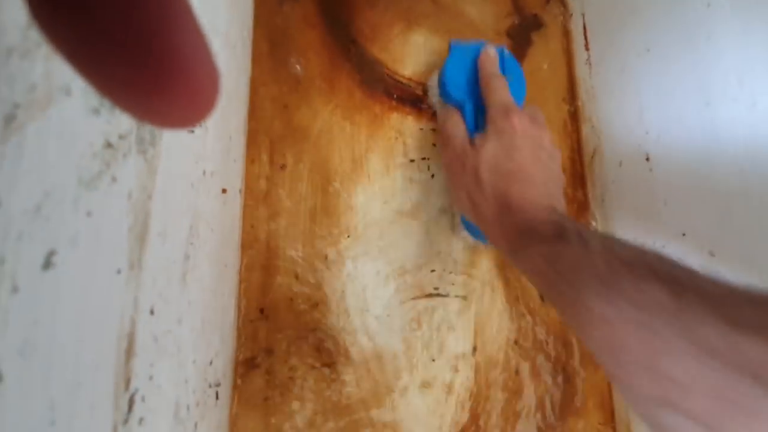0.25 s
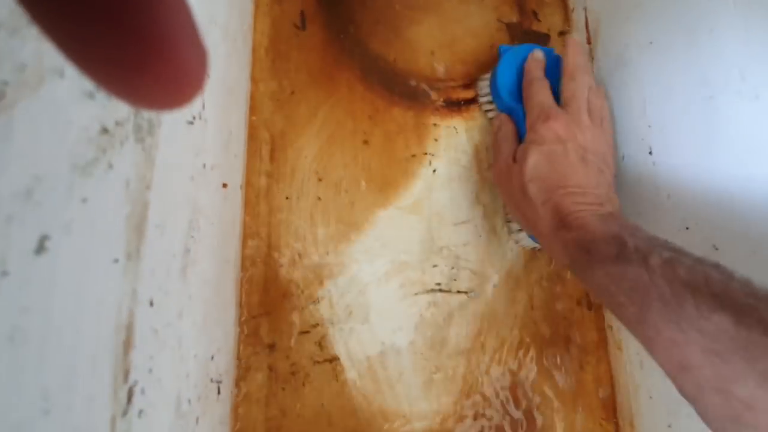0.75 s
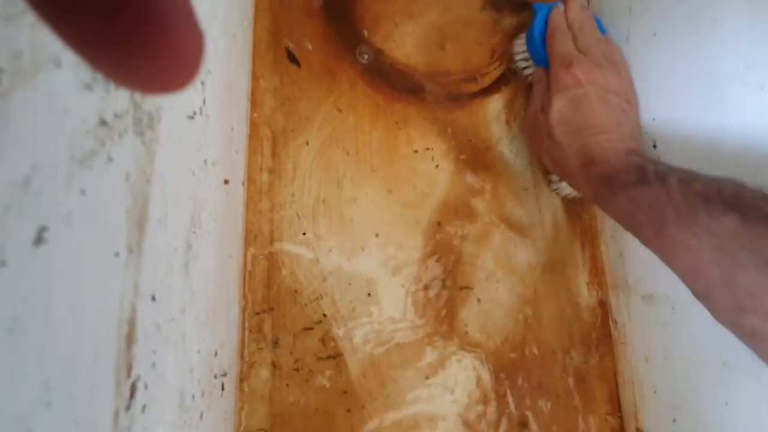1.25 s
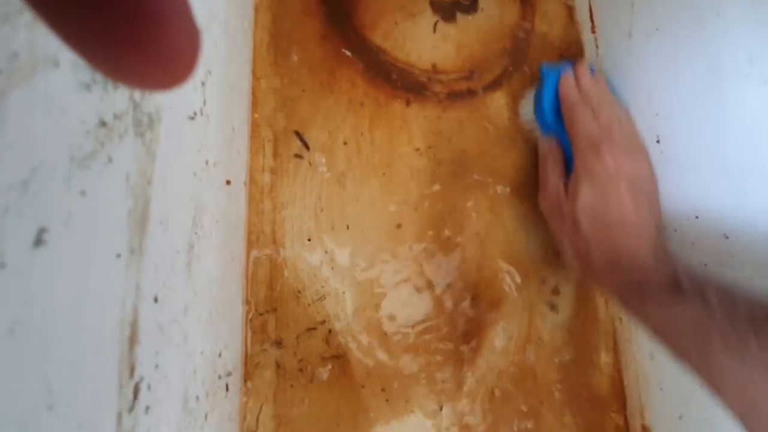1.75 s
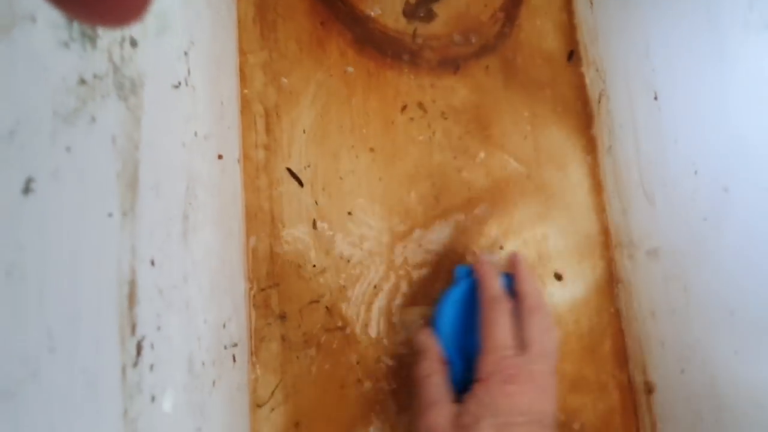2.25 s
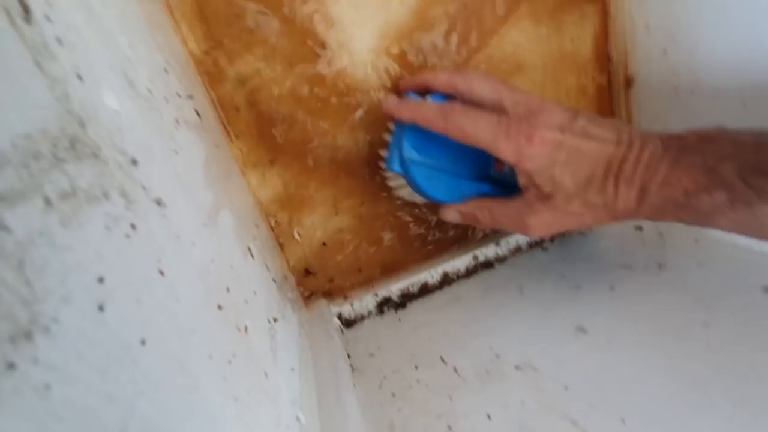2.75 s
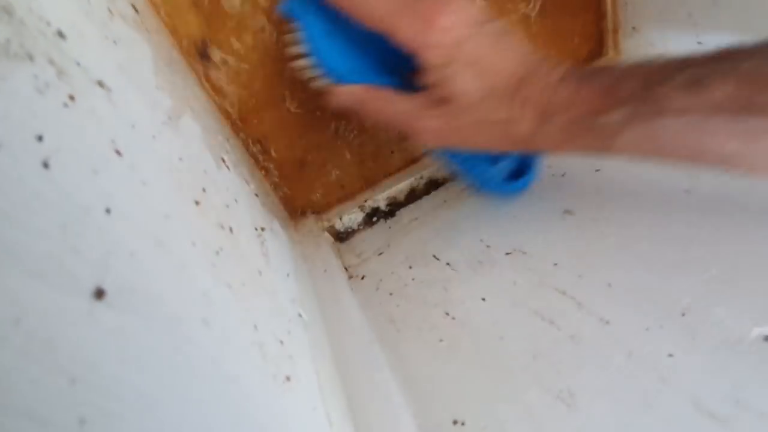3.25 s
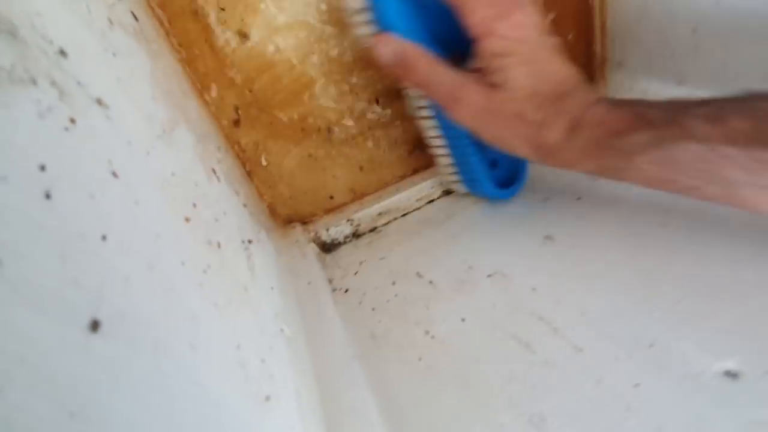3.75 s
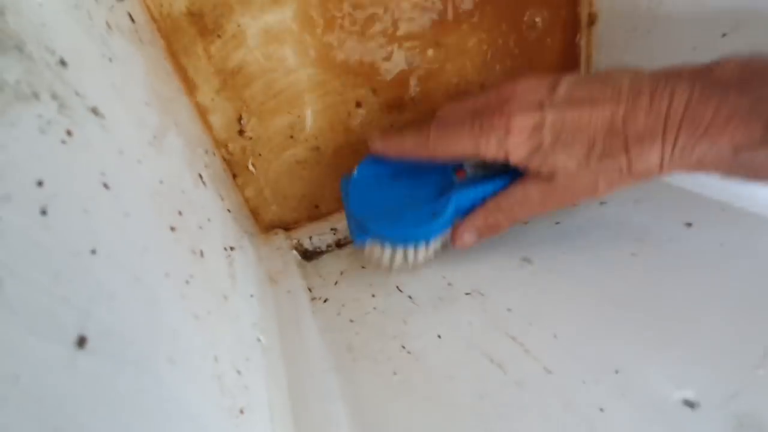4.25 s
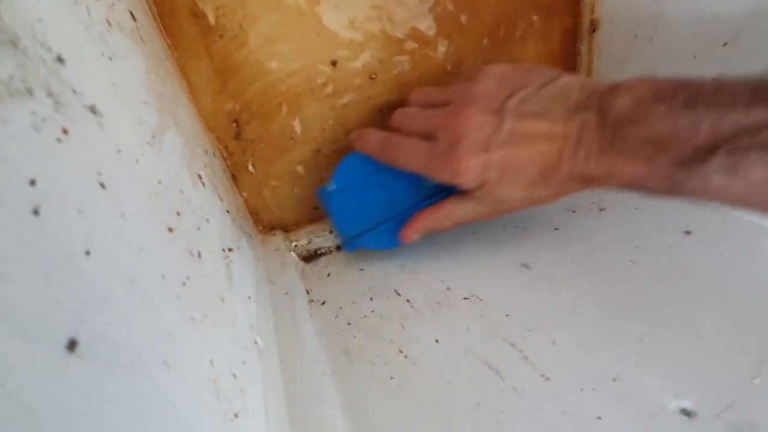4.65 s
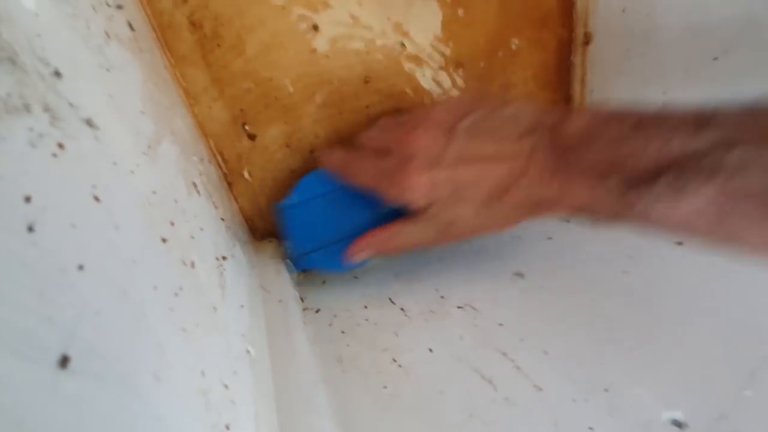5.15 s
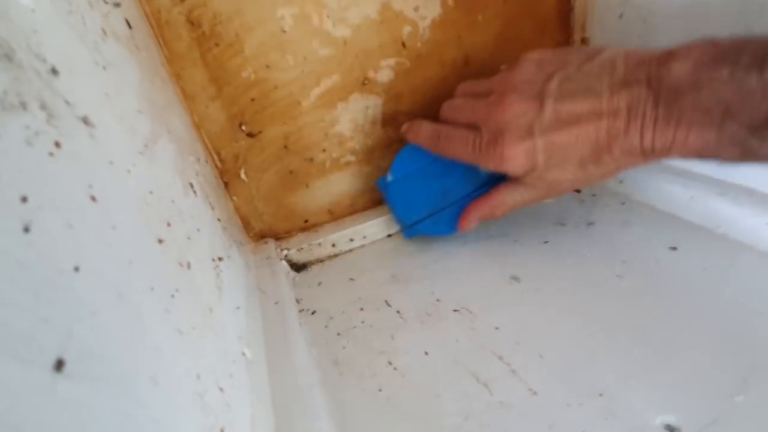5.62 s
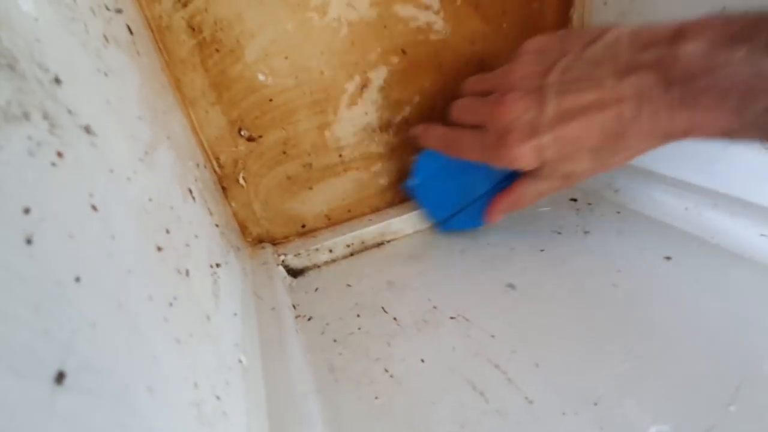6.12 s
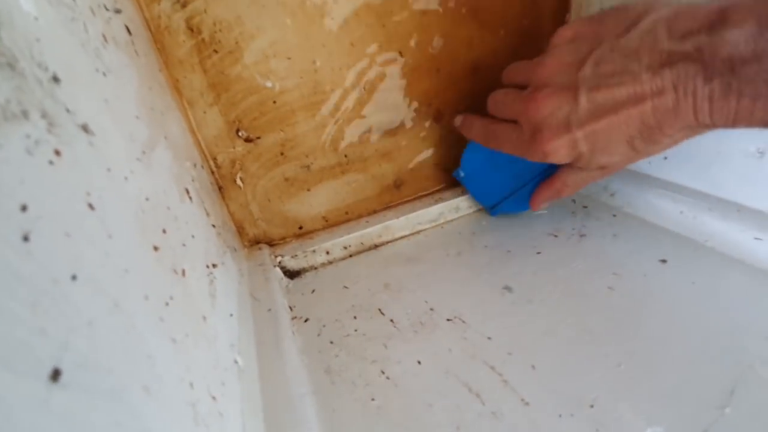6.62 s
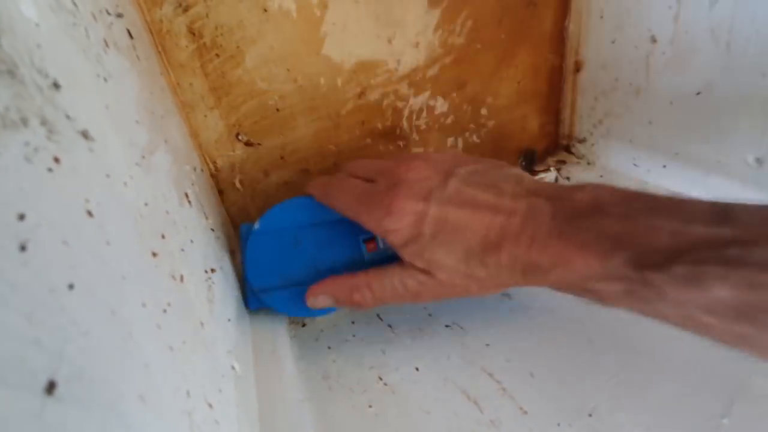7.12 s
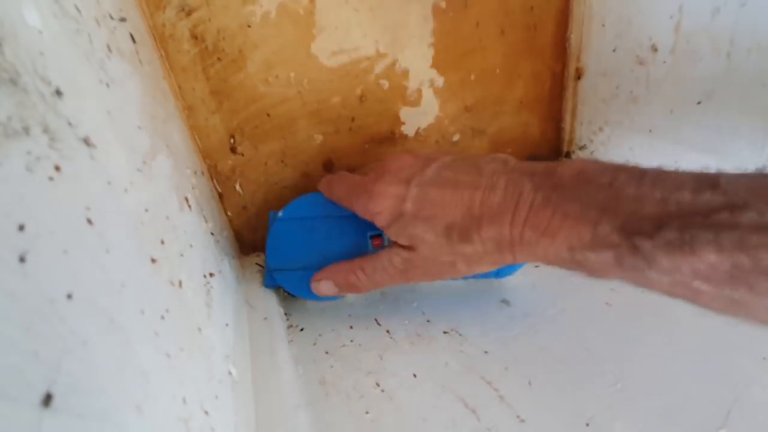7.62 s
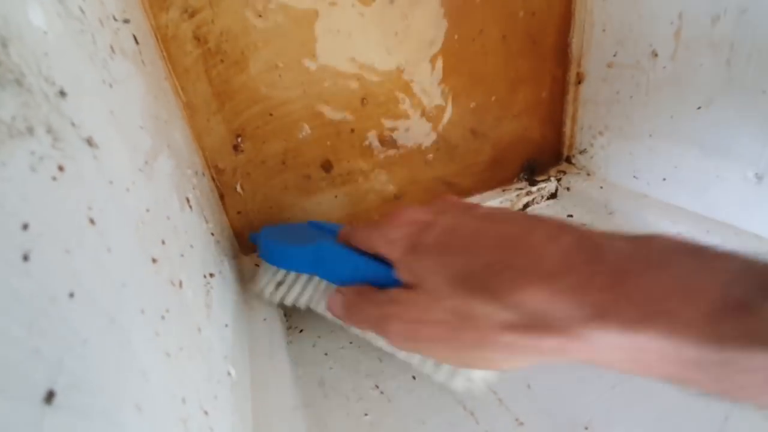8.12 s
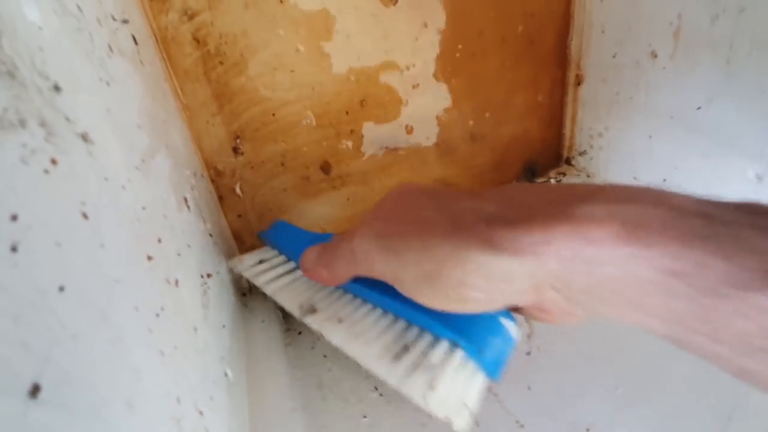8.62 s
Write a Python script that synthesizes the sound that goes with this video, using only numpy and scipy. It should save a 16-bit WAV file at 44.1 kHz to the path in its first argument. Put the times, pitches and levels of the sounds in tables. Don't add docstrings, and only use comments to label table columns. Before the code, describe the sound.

Brisk back-and-forth brushing in a small moulded hollow, heard close up in stereo. Broad wet swishes come first, with a few knocks, then hard juddering rubs as the plastic brush block hits the wall. Strokes become quieter and broken for a moment, then fast and regular along a seam, and finally uneven in a tight corner with snapping bristles and heavy dull thumps. The space answers only briefly over a very faint hush.

```python
import sys
import numpy as np
from scipy import signal
from scipy.fft import rfft, irfft, next_fast_len
from scipy.io import wavfile
from scipy.ndimage import uniform_filter1d, minimum_filter1d, map_coordinates

SR = 44100
rng = np.random.default_rng(int(sys.argv[2]) if len(sys.argv) > 2 else 0)


def invert_db(level):
    return 10 ** (np.asarray(level, dtype=float) / 20)


def wrap_up_sound(samples):
    columns = np.atleast_2d(samples).T
    tamed = np.clip(columns, -1, 1)
    steps = np.round(tamed * 32767).astype(np.int16)
    wavfile.write(sys.argv[1], SR, steps)


N = 391608


def unit(x):
    return x / np.sqrt(np.mean(x ** 2) + 1e-20)


def noise():
    return rng.standard_normal((2, N))


def along(points, hz):
    f, v = np.transpose(points)
    return np.interp(np.log(hz + 1), np.log(f + 1), v)


def wobble(rate_hz):
    step = np.arange(0, N + 64, 32)
    knots = rng.standard_normal(int(N * rate_hz / SR) + 5)
    return np.interp(np.arange(N), step, map_coordinates(knots, [step * rate_hz / SR]))


def filtered(x, response):
    m = next_fast_len(N + SR // 8, real=True)
    return irfft(rfft(x, m) * response(np.fft.rfftfreq(m, 1 / SR)), m)[..., :N]


def coloured(x, points):
    return filtered(x, lambda f: invert_db(along(points, f)))


def modes(table):
    def response(f):
        total = 0
        for k, (hz, width, db) in enumerate(table):
            total = total + (-1) ** k * invert_db(db) * 1j * f * width / (hz * hz - f * f + 1j * f * width)
        return total
    return response


# time in seconds, stiffness from 0 (open floor) to 1 (stiff corner).
CORNER = [
    (0, 0.026),
    (2.7, 0.24),
    (3.05, 1),
    (3.3, 0.63),
    (3.8, 0.76),
    (4.3, 0.8),
    (7.9, 0.84),
    (8.2, 0.97),
    (8.88, 0.69),
]
CORNER_START_S = CORNER[1][0]


def stiffness():
    s, stiff = np.transpose(CORNER)
    return np.clip(np.interp(np.arange(N) / SR, s, stiff), 0, 1)


# start in seconds, length in seconds, tip hiss in dB,
# push on the floor in dB over the hiss, push on the walls in dB over the hiss.
OPEN_FLOOR = [(-0.008, 0.069, -23.5, -4.5, -9), (0.055, 0.2, -20.5, 7.5, 3.5), (0.26, 0.22, -22, -12, -8),
              (0.473, 0.26, -19, 0, -1.5), (0.768, 0.2, -24.5, -15, -9), (0.982, 0.076, -24.5, 3, 5),
              (1.062, 0.13, -26.5, 3, 5), (1.217, 0.22, -27.5, -5, 0.5), (1.472, 0.16, -24, 1, 5.5),
              (1.664, 0.24, -26, -16.5, -15.5), (1.976, 0.14, -40, 9, 14), (2.04, 0.38, -26, -1.5, -3.5),
              (2.427, 0.26, -29, -10, -12)]
SIDE_WALL = [(2.716, 0.15, -28, 0.5, -8), (2.917, 0.099, -28.5, -4.5, 0.5), (3.052, 0.034, -31.5, -20, 1),
             (3.116, 0.49, -31, 6, 12), (3.361, 0.17, -31, 9.5, 11.5), (3.537, 0.16, -35, -1, 5),
             (3.765, 0.066, -38.5, 7, 1), (3.85, 0.062, -51, 5, 8), (3.932, 0.083, -37.5, 8, 8),
             (4.05, 0.031, -44.5, 9, -4), (4.095, 0.054, -53.5, 19, 23.5), (4.17, 0.037, -51, 6, -19),
             (4.218, 0.038, -37.5, -4, 19.5), (4.265, 0.11, -34, -17, 1), (4.387, 0.029, -24.5, -16, 8),
             (4.409, 0.15, -27, -13, -15)]
SEAM = [(4.603, 0.094, -25, -4, -6.5), (4.739, 0.11, -25.5, -11, -14.5), (4.865, 0.095, -22.5, -1.5, -2.5),
        (4.989, 0.072, -24, -6, -6.5), (5.083, 0.044, -21.5, -28, -4), (5.147, 0.049, -36.5, 10, 12.5),
        (5.21, 0.11, -32.5, -20, -3.5), (5.327, 0.061, -26.5, -2, 2), (5.412, 0.17, -23.5, -18, -26),
        (5.581, 0.1, -25.5, -5, -10), (5.716, 0.13, -22, -7, -23), (5.857, 0.11, -26, -8, 2.5),
        (6.011, 0.13, -22, -5, -29), (6.162, 0.1, -29.5, 2, -16), (6.301, 0.064, -28.5, -1, -3.5),
        (6.358, 0.082, -23, -18.5, -10), (6.437, 0.16, -35, 6.5, 5), (6.615, 0.1, -26.5, 3.5, 3.5),
        (6.677, 0.042, -19.5, -12, 0), (6.761, 0.016, -43, 1, 13), (6.801, 0.066, -31, -42, 2.5)]
FAR_CORNER = [(7.022, 0.062, -20.5, -2.5, 5), (7.102, 0.094, -25.5, 0, -6.5), (7.237, 0.057, -46, 19, 0),
              (7.328, 0.04, -44, 4, 5), (7.379, 0.078, -28.5, 13.5, -6), (7.485, 0.08, -28.5, -15, -7),
              (7.578, 0.092, -28, -1, 6), (7.664, 0.13, -35.5, 0, 7), (7.81, 0.072, -41, 6, 1),
              (7.915, 0.073, -30, -6, -1.5), (7.986, 0.052, -27.5, -16, -43), (8.036, 0.14, -30.5, -9, -3),
              (8.146, 0.12, -26.5, -18, -13), (8.272, 0.039, -22.5, -1, -1.5),
              (8.329, 0.085, -22.5, -5, -8.5), (8.432, 0.042, -24.5, 7.5, -12),
              (8.568, 0.075, -29, -29, -11), (8.656, 0.055, -25, 3.5, -2), (8.747, 0.1, -18, -5, -12.5)]
STROKES = OPEN_FLOOR + SIDE_WALL + SEAM + FAR_CORNER


def arches(level_db, release_s):
    start_shift_s, roundness = 0.0021, 0.55
    settle_db, settle_s = -9.5, 0.021
    lead_s = 0.5
    power = np.zeros(N + SR)
    for (s, length, *_), db in zip(STROKES, level_db):
        u = np.linspace(0, np.pi, int(length * SR) + 2)
        speed = np.abs(np.sin(u)) ** roundness
        power[round((s + start_shift_s + lead_s) * SR):][:len(u)] += (invert_db(db) * speed) ** 2

    def fade(seconds):
        a = 1 / (seconds * SR)
        return signal.lfilter([a], [1, a - 1], power)[SR // 2:][:N]

    return np.sqrt(np.abs(fade(release_s) + invert_db(2 * settle_db) * fade(settle_s)))


def effort():
    bristle_spring_s, floor_sway_s = 0.0034, 0.039
    s, _, hiss, floor, wall = np.transpose(STROKES)
    corner = np.interp(s, *np.transpose(CORNER))
    rasp = hiss + 2.5 + 0.3 * wall - 4.5 * corner
    return (arches(hiss, bristle_spring_s), arches(rasp, bristle_spring_s),
            arches(hiss + floor + 3, floor_sway_s), arches(hiss + wall + 0.5, bristle_spring_s))


def slips(spread_db, patchy_db):
    size = invert_db(spread_db * unit(uniform_filter1d(rng.standard_normal(N), size=24)))
    z = signal.stft(size * noise(), nperseg=256)[2]
    field = uniform_filter1d(rng.standard_normal(z.shape[1:]), size=3, axis=0)
    field = uniform_filter1d(field, size=12, axis=1)
    return signal.istft(z * invert_db(patchy_db * unit(field)), nperseg=256)[1][:, :N]


# time in seconds, peak in dB.
FLICKS = [
    (2.933, -14),
    (2.953, -10),
    (3.063, -23),
    (3.083, -14.5),
    (4.3944, -19),
    (6.35, -15),
    (6.694, -13),
    (7.027, -17),
    (8.3544, -33),
    (8.762, -23),
]


def flicks():
    gain, t = np.zeros(N + SR), np.arange(SR // 20) / SR
    for s, db in FLICKS:
        gain[round(s * SR):][:len(t)] += invert_db(db - 60 * t / 0.025) * (1 - np.exp(-t / 0.001))
    return gain[:N]


# frequency in Hz, level in dB per Hz.
TIPS = [(1760, -58), (3000, -3), (3570, -1), (3860, -1.5), (4760, -3.5), (9530, -2.5), (11000, -7.5),
        (14100, -6), (15100, -8.5), (16000, -32)]
# frequency in Hz, level in dB per Hz.
SCRAPE = [(500, 2), (900, 0), (1500, 5.5), (3000, 2), (5000, -12.5), (9000, -9)]


def bristles(hiss, rasp):
    corner = stiffness()
    chatter = 0.9 * wobble(70) + 1.3 * wobble(30)
    swarm = coloured(slips(spread_db=2.2, patchy_db=1.3), TIPS)
    dry_tips = filtered(swarm, lambda f: 0.5 + 1j * f / 9000)
    wet_tips = filtered(swarm, lambda f: 1 / (1 + 1j * f / 9000))
    tips = corner * unit(dry_tips) + (1 - corner) * unit(wet_tips)
    scrape = coloured(slips(spread_db=-0.5, patchy_db=4.0), SCRAPE)
    wet_scrape = filtered(scrape, modes([(3400, 9900, 0)]))
    tufts = corner * unit(scrape) + (1 - corner) * unit(wet_scrape) + 0.9 * block(corner)
    return (hiss * invert_db(chatter + 2.0) + flicks()) * tips + rasp * invert_db(1.76 * chatter - 2.0) * tufts


# frequency in Hz, width in Hz, level in dB.
BLOCK = [(984, 21, 2), (1150, 16, 2.5), (1300, 34, -5), (1560, 58, 0.5), (1750, 38, 2), (2143, 66, -2.5),
         (2505, 57, 0), (2980, 180, -5.5), (3487, 55, -3.5)]


def block(corner):
    rub, flares = noise(), 0
    for mode in BLOCK:
        flares = flares + filtered(invert_db(6 * wobble(16)) * rub, modes([mode]))
    return (0.3 + 0.7 * corner) * unit(flares)


def crackle(rasp):
    rate_hz = 320
    size = invert_db(4.2 * rng.exponential(size=N).clip(0, 2))
    catches = (rng.random(N) < rate_hz / SR) * size * noise()
    grit = filtered(catches, modes([(hz, 4 * width, db) for hz, width, db in BLOCK]))
    return invert_db(-5) * stiffness() * rasp * unit(grit)


# start in seconds, length in seconds, level in dB.
SING = [
    (2.055, 0.35, -22),
    (2.75, 0.12, -28),
    (3.592, 0.12, -34),
    (3.766, 0.068, -41),
    (5.438, 0.12, -29),
    (5.746, 0.084, -32),
    (6.022, 0.049, -27),
    (7.03, 0.094, -28),
]


def sing():
    gain = np.zeros(N)
    for s, length, db in SING:
        u = np.linspace(0, 1, int(length * SR))
        gain[round(s * SR):][:len(u)] = invert_db(db) * np.sqrt(u * (1 - u ** 6))
    band = modes([(2290, 1700, 0), (3730, 3100, 0)])
    return gain * unit(filtered(invert_db(0.67 * wobble(45)) * noise(), lambda f: np.abs(band(f)) ** 2))


# start in seconds, length in seconds, level in dB, pitch in Hz.
SCUFFS = [(2.789, 0.037, -27, 2200), (2.86, 0.052, -30, 1800), (2.934, 0.032, -23, 1900),
          (3.197, 0.054, -27, 1750), (3.259, .035, -36, 1150), (3.333, 0.037, -37, 1100),
          (3.425, .025, -30, 2600), (3.454, 0.058, -28.5, 1750), (3.51, 0.016, -30, 1500),
          (3.587, 0.062, -32, 1750), (3.662, .04, -33, 3300), (3.792, .05, -38, 2600),
          (4.098, 0.054, -43.5, 2000), (4.419, 0.029, -25, 1150), (4.628, 0.027, -32, 1150),
          (4.915, 0.05, -26.5, 2000), (5.348, .04, -27, 2000), (5.421, 0.042, -27.5, 2000),
          (5.5, 0.077, -33, 3300), (5.75, 0.07, -32, 3200), (5.938, 0.026, -33.5, 1500),
          (7.026, 0.059, -23.5, 1900), (7.157, 0.029, -23.5, 1700), (7.59, 0.026, -27, 2050),
          (7.938, 0.018, -20, 1450), (8.021, .03, -31, 2000), (8.076, 0.044, -32, 1000),
          (8.11, 0.021, -29, 3000), (1.05, 0.019, -21, 1604), (1.074, .025, -25, 1097),
          (1.531, 0.031, -25, 1300)]


def scuffs():
    pitch_climb, grain_db = 0.121, 4
    out = np.zeros((2, N))
    for s, length, db, hz in SCUFFS:
        u = np.linspace(0, 1, int(length * SR))
        draw = rng.standard_normal((3, SR // 10))[:, :len(u)]
        grain = invert_db(grain_db * unit(uniform_filter1d(draw[2], size=90)))
        smooth = uniform_filter1d(uniform_filter1d(draw[:2], size=60, axis=1), size=30, axis=1)
        phase = 2 * np.pi * np.cumsum(hz * (1 + pitch_climb * (u - 0.5))) / SR
        swell = np.abs(np.sin(np.pi * u ** 0.93)) ** 0.6
        out[:, round(s * SR):][:, :len(u)] += invert_db(db + 3.5) * unit(grain * smooth) * np.sin(phase) * swell
    return out


# frequency in Hz, width in Hz, level in dB.
PANEL = [(100.3, 25, -16.5), (146.2, 39, 0), (168, 48, -5)]
BOOM = [(68.5, 11, 1.5), (85.5, 13, -4.5), (110, 123, 0), (500, 60, -18)]
WALLS = [(246.6, 16.4, -9), (293.2, 33.4, -1.5), (380, 33, 0.5), (411.8, 33, 0), (462, 120, -20.5),
         (682, 54, -1), (967, 65, -12), (1150, 170, -11.5)]
RIB = [(682, 55, 0), (965, 45, -13), (1150, 60, -11)]
FLAT = [(265, 59, 5.5), (352, 72, 3.5), (424, 140, 4), (522, 36, 5.5), (538, 100, -3.5), (760, 46, -5)]


def ringing(force, table, stiff_hz=1):
    response = modes(table)
    rms = np.sqrt(np.mean(np.abs(response(np.arange(SR // 2))) ** 2))

    def stiff(f):
        return (1j * f) ** 2 / (stiff_hz ** 2 - f * f + 1j * f * 0.84 * stiff_hz)

    return filtered(force, lambda f: stiff(f) * response(f)) / rms


def shell(floor, walls, low, upper):
    corner = stiffness()
    open_floor = np.arange(N) < CORNER_START_S * SR
    lumps = floor * unit(invert_db(3.26 * wobble(40)) * noise())
    jolts = invert_db(-3.0) * walls * unit(invert_db(3.8 * wobble(55)) * noise())
    out = ringing(invert_db(-6.5) * lumps, PANEL)
    out += ringing(invert_db(-3.5 - 5.8 * corner) * lumps, BOOM)
    out += ringing(upper, RIB)
    out += ringing(corner ** 0.5 * jolts + ~open_floor * low, WALLS, 228)
    out += ringing(invert_db(-4.5) * (1 - corner) * jolts + open_floor * low, FLAT, 200)
    return out


# start in seconds, length in seconds, low
# modes (open floor before 2.7 s, then walls) in dB, upper wall modes in dB.
DRAGS = [(0.081, 0.27, -24.5, -38), (0.534, .165, -26, -38), (1.29, 0.089, -31, -45),
         (1.492, 0.051, -27, -36), (4.822, 0.034, -42, -34), (7.59, .05, -26, -32),
         (2.74, 0.062, -39.5, -41), (2.852, 0.062, -29.5, -22), (2.923, 0.077, -22.5, -30),
         (3.107, 0.052, -20, -22), (3.21, 0.056, -20.5, -29), (3.3, 0.051, -34, -37),
         (3.395, 0.064, -22, -28.5), (3.499, 0.016, -13, -17), (3.564, 0.067, -26.5, -28.5),
         (3.943, 0.033, -30, -27), (4.02, 0.021, -22, -25), (4.223, 0.12, -31, -32.5),
         (5.34, .045, -27.5, -35), (5.401, 0.032, -24, -37), (5.506, 0.049, -40, -44),
         (5.64, 0.039, -35, -32), (5.884, 0.076, -22.5, -22), (6.03, .065, -32, -30),
         (6.118, 0.03, -28, -24), (6.225, 0.053, -25, -34), (6.353, 0.076, -19.5, -19),
         (6.555, 0.059, -27, -28), (6.657, 0.048, -26, -21.5), (7.024, 0.058, -11, -17.5),
         (7.937, 0.042, -31, -38), (8.062, 0.053, -21, -25), (8.293, 0.037, -36, -33)]


def judder(hiss):
    catch_rate_hz, catch_spread_db, grip_s, let_go_s = 260, 2.5, 0.003, 0.005
    gains = np.zeros((2, N))
    for s, length, *db in DRAGS:
        t = np.arange(int((length + 0.03) * SR)) / SR
        shape = (1 - np.exp(-t / grip_s)) * np.exp(-np.clip(t - length, 0, 1) / let_go_s)
        gains[:, round(s * SR):][:, :len(t)] += np.outer(invert_db(np.array(db)), shape)
    catches = (rng.random(N) < catch_rate_hz / SR) * invert_db(catch_spread_db * rng.standard_normal(N))
    force = unit(unit(catches) * (1 + 0.5 * noise()) + 1.02 * noise())
    gains[1] += invert_db(-12) * hiss * np.clip(stiffness() + 0.39, 0, 1)
    return gains[0] * force, gains[1] * force


# time in seconds, peak in dB, hardness in dB.
RAPS = [(1.078, -3.5, -14), (1.532, -4.5, -8), (3.094, 2, -32), (3.212, -6, -8), (3.367, -8, -7),
        (3.399, -7.5, -22), (3.418, -8, -16), (3.448, -3.5, -23), (4.231, -10.5, -5), (4.253, -5.5, 3),
        (4.32, -8.5, -4), (4.357, -14, -2), (5.89, -5, -21), (5.94, -3.5, -21), (6.127, -2.5, -12),
        (6.183, -7, -9), (6.224, 2, -14), (6.351, 3, -9), (7.031, -5.5, -11), (7.053, -5.5, -25),
        (7.091, -6, -22), (7.943, -0.5, -9), (8.028, -0.5, -7), (8.062, -8, -3), (8.085, -12, -4)]
# time in seconds, peak in dB,
# floor panel over walls (over open-floor modes before 2.7 s) in dB.
THUMPS = [(1.123, -11.5, 4.5), (1.484, -18, -2), (1.954, -40, 8), (1.998, -19.5, 2), (2.628, -22.5, 4),
          (3.144, -6, -4), (3.249, -8, -13.5), (3.507, -4.5, -12), (3.526, -16, 13), (3.734, -5.5, -4.5),
          (3.938, -19, -2), (4.691, -1.5, 0), (4.935, -6, -14), (4.958, -11.5, 5.5), (5.125, 1.5, 0),
          (6.4, -5, -11), (6.543, -3, -18), (6.63, -13.5, -8), (7.177, -21.5, 10.5), (7.277, -15.5, 6.5),
          (7.446, -3, -3), (7.654, -5.5, -5), (8.24, -4, 7.5), (8.468, 0, 3), (8.686, 1, 2.5)]
# time in seconds, peak in dB, crack over walls in dB, crack in Hz.
CLACKS = [(1.053, -2, -10, 1405), (2.929, -8.5, -11.5, 1713), (3.602, -23.5, -3.5, 1130),
          (3.962, -8.5, -19, 1070), (4.02, -20, -28, 900), (4.039, -14.5, -13.5, 1060),
          (4.41, -13.5, -2.5, 1750), (5.353, -19.5, -6, 2190), (5.415, -16.5, -11.5, 1895),
          (6.696, -17, 6, 2265), (7.168, -21, -1, 1900), (7.284, -1, -19, 1320), (7.406, -19, 2.5, 1150),
          (7.597, -10.5, -7, 2067), (7.925, -13, -17, 1520), (7.945, -17, -4, 1560),
          (8.028, -17.5, -2.5, 1750), (8.022, -25.5, 6.5, 2313), (8.112, -18, -7, 1090),
          (3.214, -26, -0.5, 1750), (8.357, -8.5, -13, 1150), (8.827, -20, 6.5, 1813)]


def blows():
    raps = [(s, db, -18, -32, 2600, hard_db) for s, db, hard_db in RAPS]
    thumps = [(s, db, floor_db, -22.5, 1000, -21.5) for s, db, floor_db in THUMPS]
    clacks = [(s, db, -12.5, crack_db, hz, -2.5) for s, db, crack_db, hz in CLACKS]
    return raps + thumps + clacks


def struck(table, t, damp, tilt_db):
    hz, width, level = (c[:, None] for c in np.transpose(table))
    draw = rng.standard_normal((2, len(table), 3))
    tone = np.sin(2 * np.pi * hz * (1 + 0.028 * draw[..., :1]) * t + 1.29 * draw[..., 2:])
    level = level + 2 * draw[..., 1:2] + tilt_db * np.log2(hz / hz[2])
    return (invert_db(level) * np.exp(-np.pi * damp * width * t) * tone).sum(axis=1)


def knocks():
    out, t = np.zeros((2, N + SR)), np.arange(SR // 8) / SR
    for s, db, floor_db, crack_db, hz, hard_db in blows():
        in_corner = s > CORNER_START_S
        tilt_db = np.clip(0.45 * (hard_db + 15.5), -10, 8)
        walls = struck(WALLS if in_corner else FLAT, t, 0.66, tilt_db) * (1 - np.exp(-(t / 0.0019) ** 2))
        floor = struck(PANEL, t, 0.55, 0)
        if s < CORNER_START_S:
            floor = floor + invert_db(-5) * struck(BOOM[:3], t, 1.0, 0)
        floor = floor * (1 - np.exp(-(t / 0.022) ** 2)) * np.exp(-(t / 0.029) ** 2)
        rattle = uniform_filter1d(rng.standard_normal((2, len(t))), size=40, axis=1)
        crack = rattle * np.sin(2 * np.pi * hz * t) * invert_db(-60 * t / 0.064) * (1 - np.exp(-t / 0.0012))
        blow = invert_db(-2.0) * walls / np.abs(walls).max() + invert_db(floor_db + 10.5) * floor + invert_db(crack_db + 23.0) * crack
        out[:, round(s * SR):][:, :len(t)] += invert_db(db) * blow
    return out[:, :N]


# frequency in Hz, t60 in seconds.
WELL = [(150, 0.098), (1000, 0.14), (8000, 0.028)]


def well(x):
    hz, t, z = signal.stft(rng.standard_normal((2, SR // 4)), SR, nperseg=256)
    tail = signal.istft(z * invert_db(-60 * t / along(WELL, hz)[:, None]), SR, nperseg=256)[1]
    late = np.pad(x, ((0, 0), (130, 0)))
    return signal.fftconvolve(late, tail / np.linalg.norm(tail[0]), axes=1)[:, :N]


# frequency in Hz, level in dB per Hz.
HUSH = [(15, -34), (25, 17), (261, -9), (333, -7), (403, 9), (791, -35), (955, -6), (1470, -16),
        (15800, -27)]


def hush():
    return invert_db(-52) * unit(coloured(noise(), HUSH))


# frequency in Hz, left-right likeness from -1 to 1.
ALIKE = [(60, 1), (200, 0.98), (400, 0.91), (700, 0.5), (1000, 0.032), (1400, -0.29), (2000, 0.043),
         (15000, -0.028)]


def scene():
    hiss, rasp, floor, walls = effort()
    near = bristles(hiss, rasp) + crackle(rasp) + sing() + scuffs()
    near = near + shell(floor, walls, *judder(hiss)) + knocks()

    def blend(f):
        turn = np.arccos(np.clip(along(ALIKE, f), -1, 1)) / 2
        return np.array([np.cos(turn), np.sin(turn)])

    mid, side = filtered(near + invert_db(-13.5) * well(near) + hush(), blend)
    return np.array([mid + side, mid - side])


def band_limit(x):
    return signal.sosfilt(signal.butter(12, 16820, fs=SR, output="sos"), x)


# frequency in Hz, left over right in dB.
LEAN = [(60, -1), (180, 1), (550, -0.5), (1650, 3.5), (4970, -0.5), (15000, 0)]


def record(dry):
    def microphone(f):
        ports = invert_db(np.outer([0.5, -0.5], along(LEAN, f)))
        bass_cut = ((1j * f) ** 2 / (57 ** 2 - f * f + 1j * f * 56)) ** 3
        return ports * (f < 15900) * bass_cut

    x = filtered(dry, microphone)
    need = np.minimum(1, 0.97 / (np.abs(x).max(axis=0) + 1e-9))
    x = x * uniform_filter1d(minimum_filter1d(need, size=400), size=200)
    return band_limit(x)


dry = scene()
out = record(dry)
wrap_up_sound(out)
```